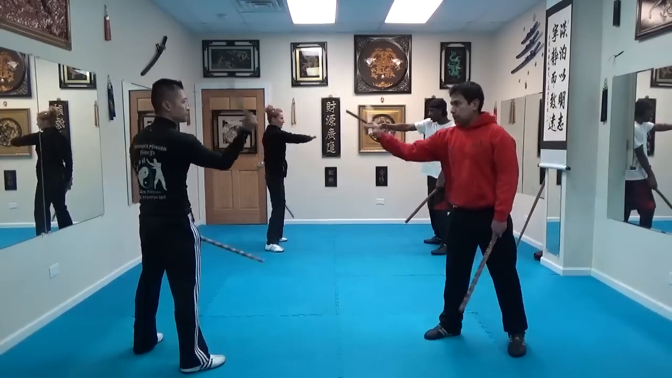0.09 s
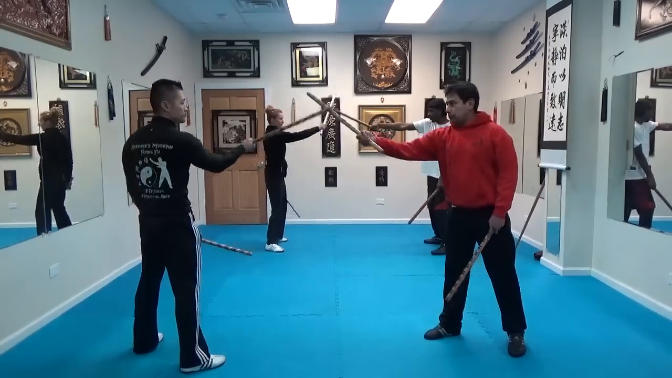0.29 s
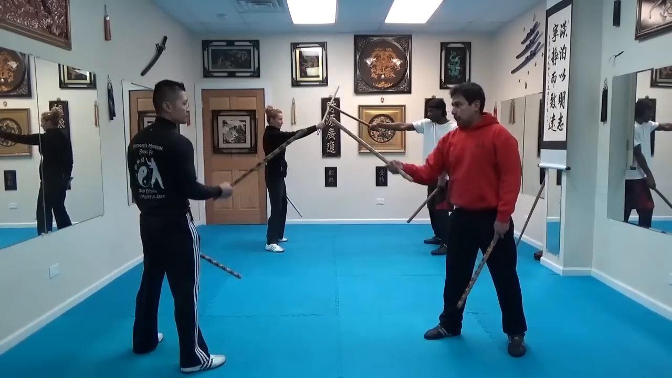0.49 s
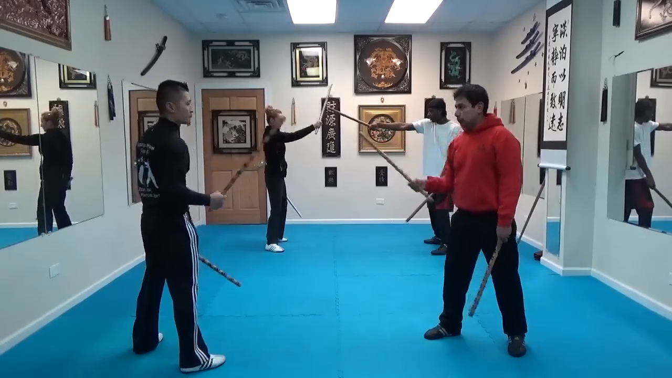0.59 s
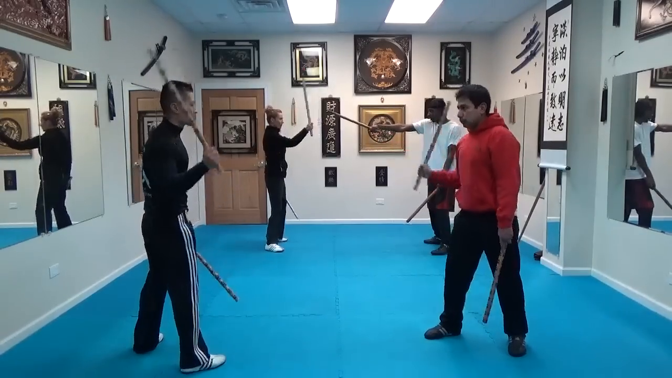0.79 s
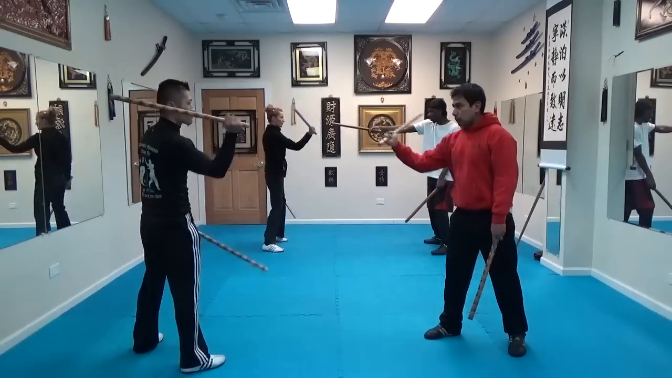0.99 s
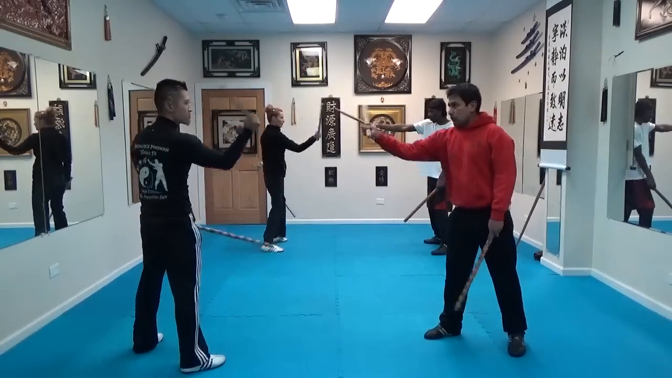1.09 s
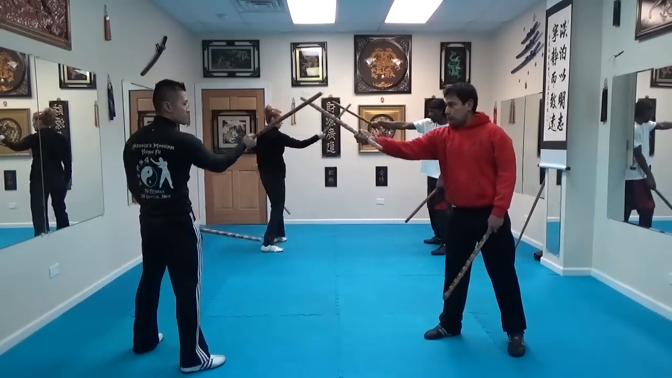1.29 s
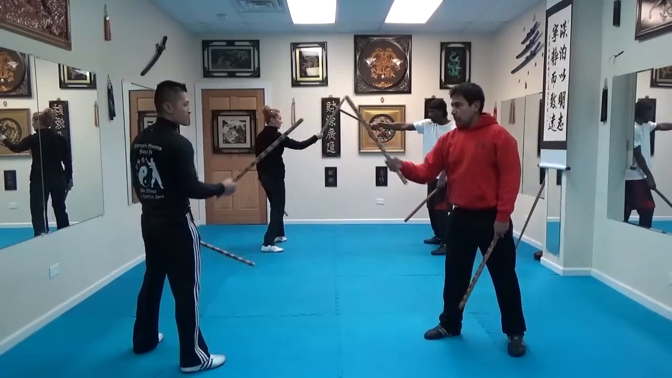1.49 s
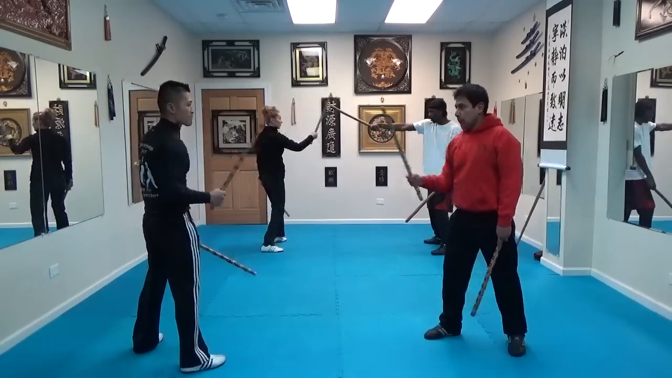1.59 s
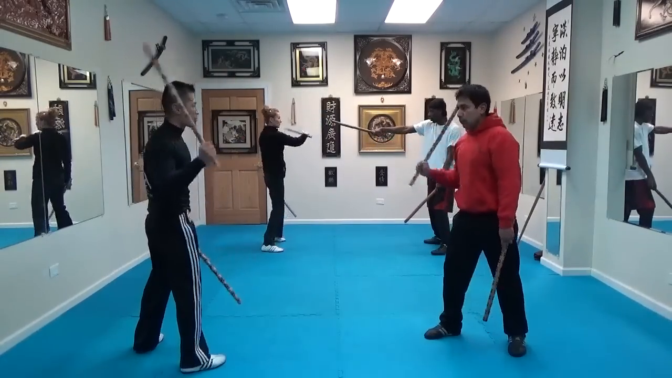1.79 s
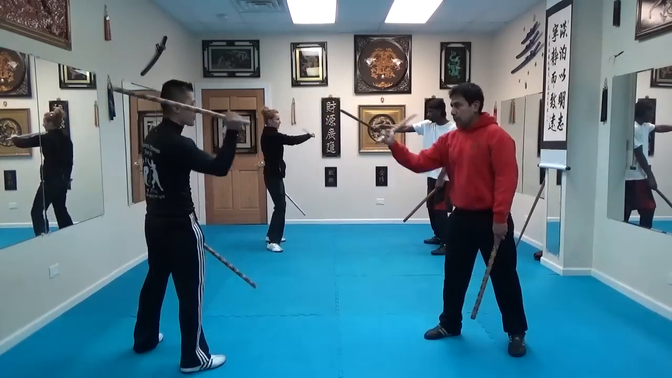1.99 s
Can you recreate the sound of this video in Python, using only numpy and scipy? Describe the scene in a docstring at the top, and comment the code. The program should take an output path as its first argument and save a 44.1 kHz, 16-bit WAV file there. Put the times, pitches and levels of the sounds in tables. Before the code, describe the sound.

Two clusters of sharp wooden stick clacks, a bright near blow then duller distant knocks, each with a dense echo dying away; barely audible sleeve swishes and soft foot shifts between, in a hard-walled training room.

```python
"""In a bare, echoing studio, two pairs of partners clack wooden training sticks together.
The near pair strikes once a second and the far pair follows with hollower knocks.
Each blow is a contact pulse plus damped bending modes, convolved with a noise-built room response.
A fast limiter holds the echo level for a moment; sleeves swish and feet shift over a faint hum and hiss."""
import sys
import numpy as np
from scipy import signal
from scipy.fft import rfft, irfft
from scipy.io import wavfile
from scipy.ndimage import uniform_filter1d

SR = 44100
rng = np.random.default_rng(int(sys.argv[2]) if len(sys.argv) > 2 else 0)


def put_to_file(sound):
    """Save the sound as 16-bit audio at rate SR, in the file named by the first command-line argument."""
    columns = np.atleast_2d(sound).T  # one column per channel
    safe = np.clip(columns, -1, 1)
    whole_steps = np.round(safe * 32767)
    wavfile.write(sys.argv[1], SR, whole_steps.astype(np.int16))


N = 88200  # samples
T = np.arange(N) / SR  # s
HZ = np.fft.rfftfreq(N, 1 / SR)


def amp(db):
    """Level as a ratio: decibels become an amplitude gain."""
    return 10 ** (np.asarray(db) / 20)


def unit(x):
    """Energy normalization: the mean energy per channel becomes one."""
    energy = np.mean(np.sum(x ** 2, -1))
    return x / np.sqrt(energy + 1e-20)


def read(points, hz):
    """Logarithmic pitch: a table is interpolated on a log-frequency axis."""
    f, value = np.transpose(points)
    return np.interp(np.log(hz + 1), np.log(f + 1), value)


def add(mix, s, sound):
    """Superposition: a sound is summed into the mix from time s in seconds."""
    part = mix[:, max(round(s * SR), 0):]
    part += sound[..., :part.shape[1]]


def colour(x, db):
    """Minimum phase: the Hilbert transform of log gain gives the phase of a causal filter."""
    log_gain = np.log(amp(np.r_[db, db[-2:0:-1]]))
    response = np.exp(np.conj(signal.hilbert(log_gain)))[:len(HZ)]
    return irfft(rfft(x) * response, N)


def pair(two):
    """Interchannel coherence: sharing mid and side energy makes left and right partly alike."""
    # Left-right likeness. Each row: frequency in Hz, coherence from 0 to 1.
    likeness = [(40, 0.96), (130, .9), (500, 0.86), (1000, 0.68), (4000, 0.73), (8000, 0.67), (11000, 0.9)]
    same = np.clip(read(likeness, HZ), 0, 1)
    mid, side = rfft(two) * np.sqrt([(1 + same) / 2, (1 - same) / 2])
    return irfft(np.array([mid + side, mid - side]), N)


def noise(spectrum):
    """Spectral shaping: white noise is filtered to a given spectrum, in stereo at rms 1."""
    white = rng.standard_normal((2, N))
    shaped = irfft(rfft(white) * amp(read(spectrum, HZ)), N)
    return np.sqrt(N) * unit(pair(shaped))


def burst(fade_s):
    """Exponential decay: a dying spray of noise with unit energy."""
    return unit(rng.standard_normal(N) * np.exp(-T / fade_s))


def near_sticks():
    """Impact excitation: loud contacts drive bending modes close by, over a faint, dull thud."""
    # Blows of the near pair. Each row: start in seconds, level in dB before limiting,
    # contact point (0 = tip, 1 = middle), brightness in dB per octave, thud in the hands in dB re the blow.
    blows = [(0.2307, 30, 0.082, 1.4, -42.5), (1.2342, 26, 0.98, 1, -41)]
    # Bending modes. Each row: frequency in Hz, t60 in seconds, relative dB struck at the tip, at the middle.
    modes = [(614, 0.036, -29.5, -17), (1133, .04, -14, -7.5), (1517.4, 0.1, -43, 1.5), (1735, .07, 3, 0),
             (2017, .05, 2, -8.5), (2420, 0.022, -5, 6.5), (2667, 0.019, -15.5, 4),
             (3060, 0.036, 10.5, -31), (3280, 0.022, 2.5, -4.5), (3986, .03, 5.5, -7.5),
             (4144, .025, 1.5, -7), (4997, 0.022, 1, -4.5), (5525, .025, -24, -1.5)]
    # Contact of wood on wood. Each row: frequency in Hz, relative level in dB per Hz.
    contact = [(40, -29), (150, -24), (350, -26), (600, -13), (1000, -9), (1700, -1.5), (3000, 2.5),
               (4400, -4), (5500, -4.5), (6400, -19.5), (7800, -16), (11000, -20)]
    # Thud in the hands. Each row: frequency in Hz, relative level in dB per Hz.
    thud_spectrum = [(30, -18), (140, -8), (330, 1.5), (600, 0), (1500, -21), (11000, -65)]
    ring_db, direct_db, scatter_hz = -1.5, -14, 1400
    thud_rise_s, thud_fade_s = 0.02, 0.1
    out = np.zeros((2, N))
    for s, db, point, bright, thud_db in blows:
        blow = tilted(crack(contact) + amp(ring_db) * ring(modes, point), bright)
        thud_envelope = (1 - np.exp(-T / thud_rise_s)) * np.exp(-T / thud_fade_s)
        thud = unit(noise(thud_spectrum) * thud_envelope)
        add(out, s, amp(db) * (studio(blow, direct_db, scatter_hz) + amp(thud_db) * thud))
    return out


def far_sticks():
    """Modal excitation: hollower knocks with a splintery snap, each also feeding standing waves."""
    # Blows of the far pair. Each row: start in seconds, level in dB before limiting,
    # contact point (0 = tip, 1 = middle), brightness in dB per octave, splintery snap in dB,
    # direct sound in dB, standing waves in dB (the last three relative to the blow's level).
    blows = [(0.3554, 15, 0.0, -0.9, -0.5, -8, 0.5), (0.4806, 13, 0.38, 0.9, -7, -4, -2),
             (1.2733, 15, 0.36, 3.5, -10, -6.5, 3.5), (1.315, 14.5, 1.0, 0.06, -8.5, -30, -5.5),
             (1.3627, 0.5, 0.9, -2.5, 2.5, 2.5, -31.5)]
    # Bending modes. Each row: frequency in Hz, t60 in seconds, relative dB struck at the tip, at the middle.
    modes = [(680, 0.036, -6.5, -16), (818.5, 0.12, -3.5, 1), (1154, 0.039, -3.5, -8.5), (1516, .07, 3, 2),
             (1581, .12, -16, -2.5), (1820, .04, -2.5, -24), (2225, 0.044, -8, 4.5), (2840, .025, 3.5, 2.5),
             (3088, .025, -2.5, 2), (4250, .018, -4.5, -16)]
    # Contact of wood on wood. Each row: frequency in Hz, relative level in dB per Hz.
    contact = [(40, -41), (150, -32.5), (350, -18), (600, 0.5), (1000, 0.5), (1700, 9.5), (3000, 1),
               (4400, -3), (5500, -5.5), (6400, -23), (7800, -10.5), (11000, -15.5)]
    # Splintery snap. Each row: frequency in Hz, relative level in dB per Hz.
    snap_spectrum = [(40, -63), (3000, -48), (6300, -11.5), (7300, 1), (8500, -2), (11000, -7)]
    ring_db, scatter_hz = -3, 400
    out = np.zeros((2, N))
    for s, db, point, bright, snap_db, direct_db, standing_db in blows:
        blow = tilted(crack(contact) + amp(ring_db) * ring(modes, point), bright)
        blow = blow + amp(snap_db) * crack(snap_spectrum)
        heard = studio(blow, direct_db, scatter_hz) + amp(standing_db) * standing_waves()
        add(out, s, amp(db) * heard)
    return out


def crack(spectrum):
    """Broadband impulse: contact is a sharp pulse with a brief chatter of wood fibres."""
    chatter_s = 0.00037
    return unit(colour((T == 0) + 0.33 * burst(chatter_s), read(spectrum, HZ)))


def ring(modes, point):
    """Modal superposition: the contact point weights bending modes that die quickly in the hand."""
    thin_hz = 455  # a thin stick radiates little below this
    t = T[:SR // 4]
    rung = np.zeros(len(t))
    for k, (hz, t60, tip_db, middle_db) in enumerate(modes):
        decay = np.exp(-np.log(1000) * t / t60)
        mode = unit(np.cos(2 * np.pi * hz * t) * decay)
        level_db = tip_db + point * (middle_db - tip_db)
        rung += (-1) ** k * amp(level_db) * mode  # alternating sign
    highpass = signal.butter(2, thin_hz, "highpass", fs=SR, output="sos")
    radiated = signal.sosfilt(highpass, rung)
    return np.pad(unit(radiated), (0, N - len(t)))


def tilted(x, db_per_octave):
    """Spectral tilt: each blow is made brighter or duller by a slope in dB per octave, pivoting at 2 kHz, flat
    below 700 Hz."""
    return colour(x, db_per_octave * np.log2(np.maximum(HZ, 700) / 2000))


def studio(sound, direct_db, scatter_hz, count=14):
    """Room impulse response: direct sound and scatter, smeared wall echoes, a tail with late bass."""
    # Reverberation. Each row: frequency in Hz, t60 in seconds.
    room_t60 = [(60, 0.52), (240, 0.71), (500, 0.5), (830, 0.75), (1100, 0.56), (1550, 0.61), (2100, 0.51),
                (3000, 0.49), (4500, 0.46), (7500, 0.36), (11000, 0.4)]
    first_s, build_s, bass_build_s = 0.0025, 0.0099, 0.0061
    echo_db, echo_fade_s, wall_smear_s = -3, 0.0096, 0.00056
    scatter_s, scatter_db = 0.0082, 8.5  # bodies and framed walls break up the first reflections
    # First reflections are weak below scatter_hz.
    thin = signal.butter(2, scatter_hz, "highpass", fs=SR, output="sos")

    taps = rng.standard_normal((2, N)) * (T > first_s) * (1 - np.exp(-T / build_s))
    hz, t, z = signal.stft(taps, SR, nperseg=256)
    build_rate = ((hz[:, None] + 100) / scatter_hz) ** 2 / bass_build_s
    swell = 1 - np.exp(-(t + first_s) * build_rate)
    decay = amp(-60 * t / read(room_t60, hz)[:, None])
    tail = unit(signal.istft(z * swell * decay, SR, nperseg=256)[1][:, :N])

    echoes = np.zeros((2, N))
    for side in echoes:
        delay = rng.uniform(first_s, 0.06, count)
        side[(delay * SR).astype(int)] = rng.choice([-1, 1], count) * np.exp(-delay / echo_fade_s)
    smeared = signal.fftconvolve(echoes, burst(wall_smear_s)[None], axes=1)[:, :N]
    echoes = unit(signal.sosfilt(thin, smeared))

    scatter = pair(signal.sosfilt(thin, [burst(scatter_s), burst(scatter_s)]))
    direct = unit((T == 0) + amp(scatter_db) * scatter)
    room = amp(direct_db) * direct + pair(tail + amp(echo_db) * echoes)
    return signal.fftconvolve(sound[None], room, axes=1)[:, :N]


def standing_waves():
    """Room resonance: a few modes between the walls build up and outlast the echo."""
    # Standing waves. Each row: frequency in Hz, t60 in seconds, relative level in dB.
    resonances = [(251.5, 0.34, -30.5), (647, 0.75, -28), (823, 0.34, -23.5), (845, 0.47, -25.5),
                  (1447, .9, -23), (1500, 0.81, -23), (1588, 0.84, -20.5)]
    rise = 1 - np.exp(-T / 0.013)  # time constant in s
    out = np.zeros(N)
    for hz, t60, db in resonances:
        tone = np.sin(2 * np.pi * (hz * T + rng.random()))
        out += amp(db) * unit(rise * tone * np.exp(-np.log(1000) * T / t60))
    return out


def sleeves():
    """Friction noise: cloth brushes softly as the arms swing, each swish a bell-shaped swell."""
    # Swishes. Each row: time of peak in seconds, half length (standard deviation) in seconds, level in dB.
    swishes = [(0.018, 0.071, -55), (1.099, 0.073, -57.5), (1.987, 0.096, -59)]
    # Cloth. Each row: frequency in Hz, relative level in dB per Hz.
    cloth = [(100, -43), (600, 0), (1500, -1.5), (3000, 0.5), (5000, 1), (6500, -7), (8000, 0), (11000, -2)]
    swell = sum(amp(db) * np.exp(-.5 * ((T - s) / half) ** 2) for s, half, db in swishes)
    return noise(cloth) * swell


def steps():
    """Damped impact: feet shift softly on the foam mats as short bursts of dull noise."""
    # Soft steps. Each row: start in seconds, initial level in dB.
    footfalls = [(0.818, -65), (0.967, -56.5), (1.592, -48.5)]
    # Foam mat. Each row: frequency in Hz, relative level in dB per Hz.
    mat = [(40, -24), (150, -7.5), (330, -4.5), (800, -7), (1600, -10.5), (5000, -19), (11000, -40)]
    fade_s = 0.019
    out = np.zeros((2, N))
    for s, db in footfalls:
        add(out, s, amp(db) * noise(mat) * np.exp(-T / fade_s))
    return out


def room_tone():
    """Stationary background: steady shaped air noise plus sine tones of a faint hum."""
    # Air noise. Each row: frequency in Hz, relative level in dB per Hz.
    air = [(20, -18.5), (50, -20), (120, -4.5), (250, -8.5), (450, -5), (850, -6), (1800, -10), (3000, -13),
           (4000, -13), (6500, -19), (11000, -14.5)]
    # Hum. Each row: frequency in Hz, rms level in dB.
    hum_tones = [(239, -73), (192.9, -81)]
    air_db = -61.5
    hum = sum(amp(db) * np.sqrt(2) * np.sin(2 * np.pi * (hz * T + rng.random())) for hz, db in hum_tones)
    return amp(air_db) * noise(air) + hum


def scene():
    """Linear superposition: both pairs, their sleeves and feet, and the room add up."""
    return near_sticks() + far_sticks() + sleeves() + steps() + room_tone()


def record(dry):
    """Gain reduction: a fast limiter flattens cracks, recovering as the echo dies; then a band limit."""
    threshold_db, slope, recover_db_per_s, sense_s = -14, 0.92, 170.5, 0.0019
    edge_hz = 11170
    power = uniform_filter1d((dry ** 2).mean(0), max(int(sense_s * SR), 1))
    level_db = 10 * np.log10(abs(power) + 1e-12)
    # The running peak falls at a constant rate in dB.
    fall = T * recover_db_per_s
    peak_db = np.maximum.accumulate(level_db + fall) - fall
    over_db = np.maximum(peak_db - threshold_db, 0)
    held = dry / amp(slope * uniform_filter1d(over_db, size=60))
    lowpass = signal.firwin(511, edge_hz, window=("kaiser", 9), fs=SR)
    return signal.oaconvolve(held, lowpass[None], "same")


dry = scene()
out = record(dry)
put_to_file(out)
```